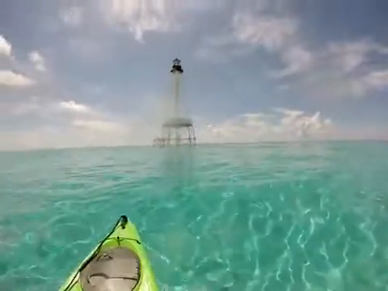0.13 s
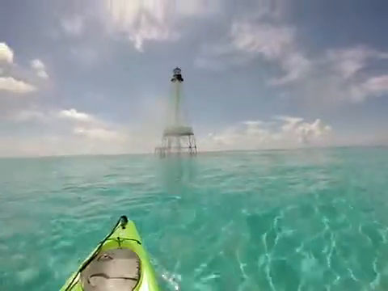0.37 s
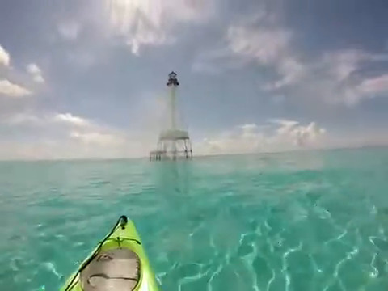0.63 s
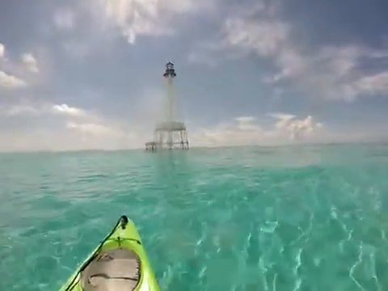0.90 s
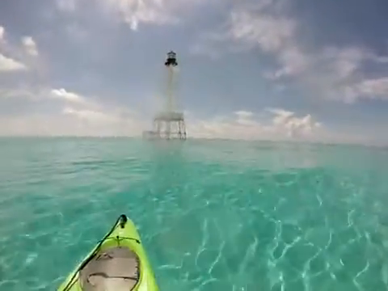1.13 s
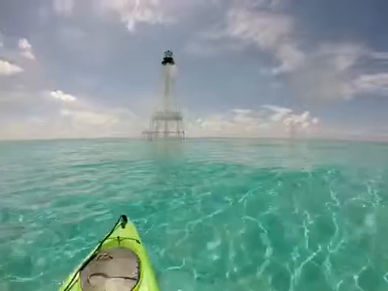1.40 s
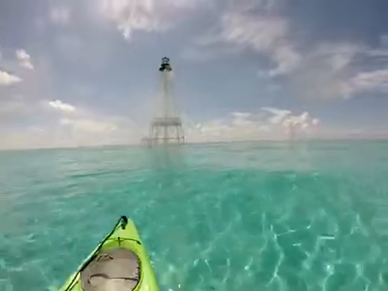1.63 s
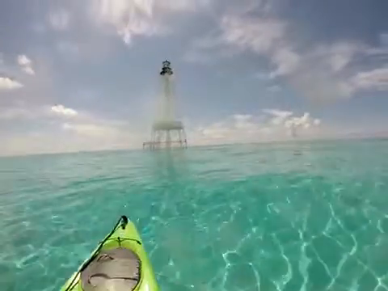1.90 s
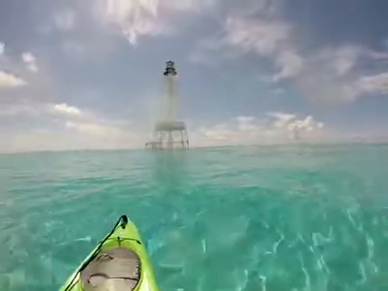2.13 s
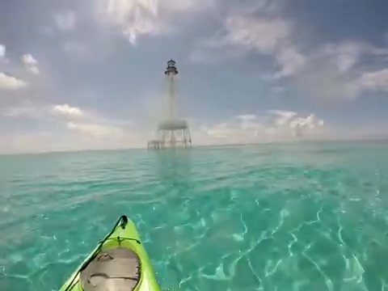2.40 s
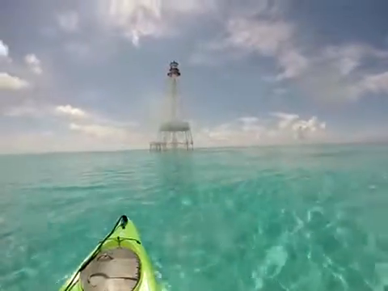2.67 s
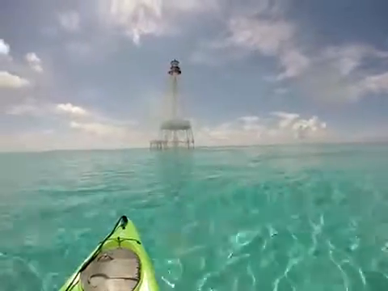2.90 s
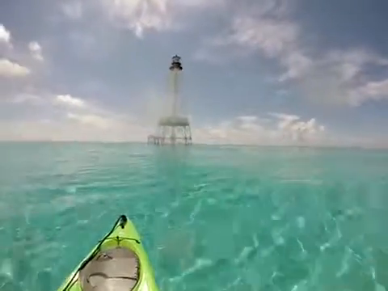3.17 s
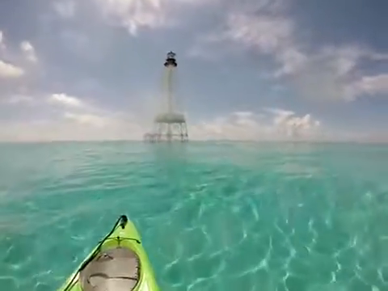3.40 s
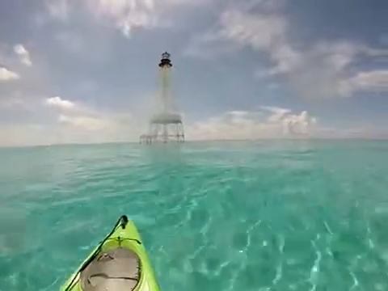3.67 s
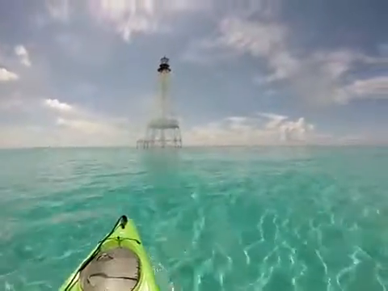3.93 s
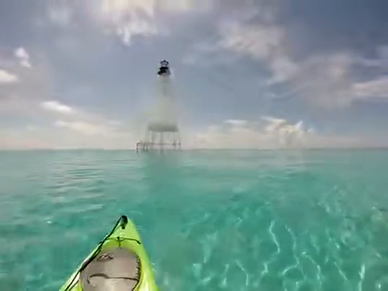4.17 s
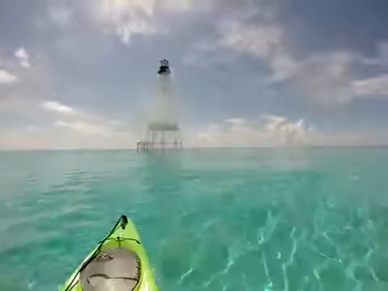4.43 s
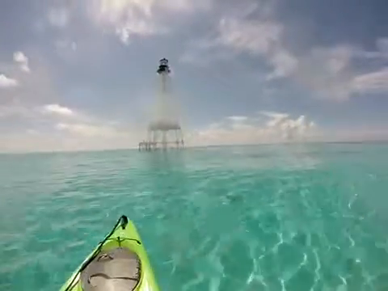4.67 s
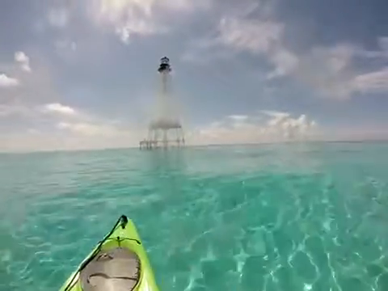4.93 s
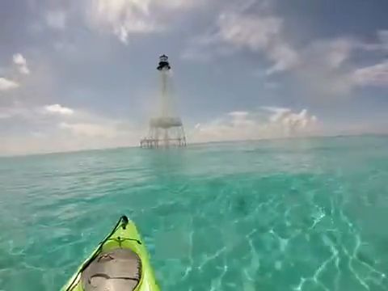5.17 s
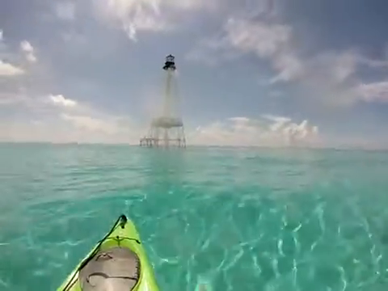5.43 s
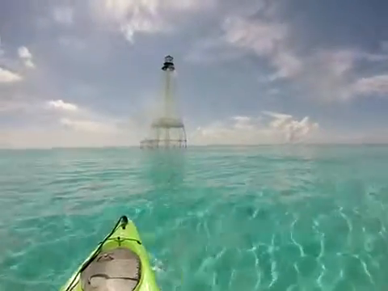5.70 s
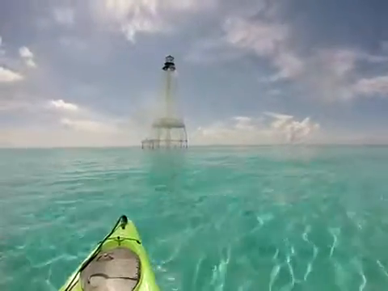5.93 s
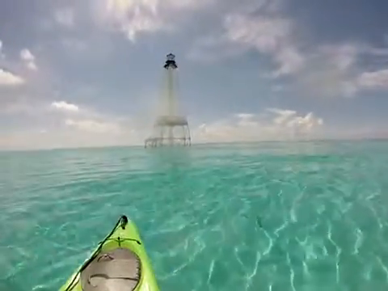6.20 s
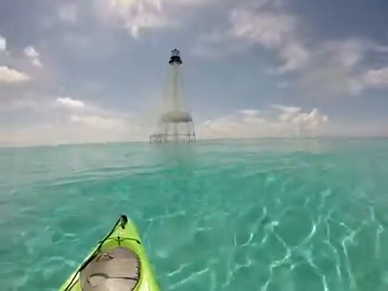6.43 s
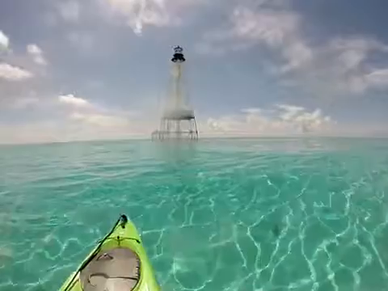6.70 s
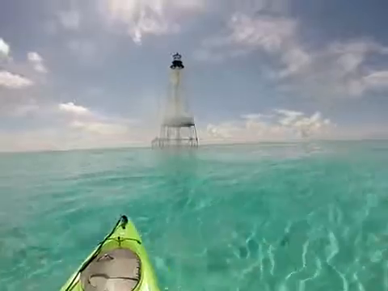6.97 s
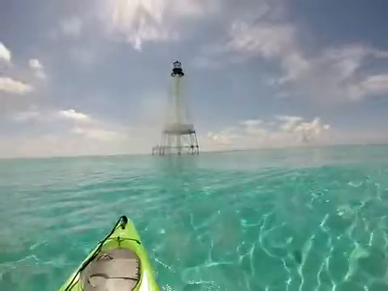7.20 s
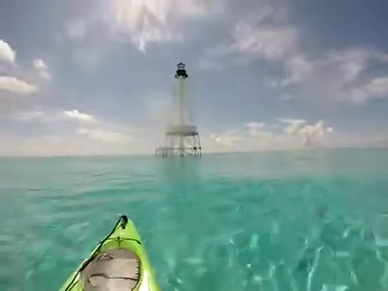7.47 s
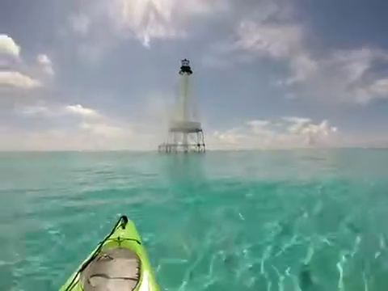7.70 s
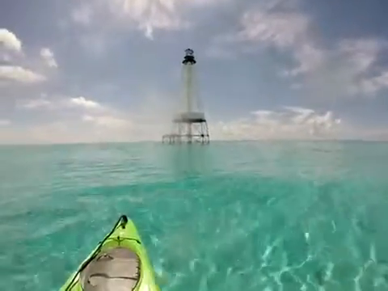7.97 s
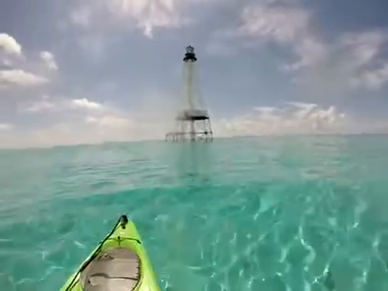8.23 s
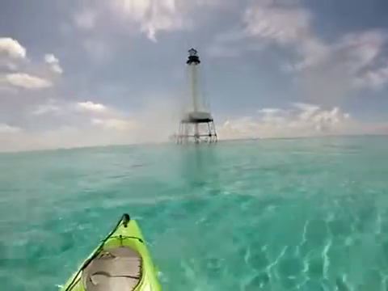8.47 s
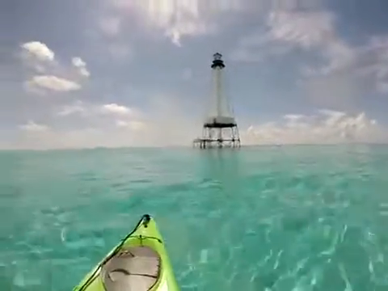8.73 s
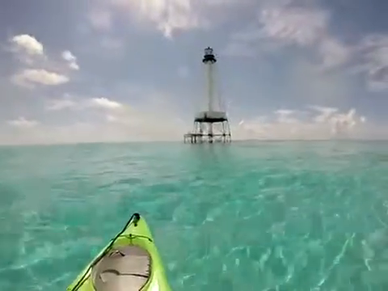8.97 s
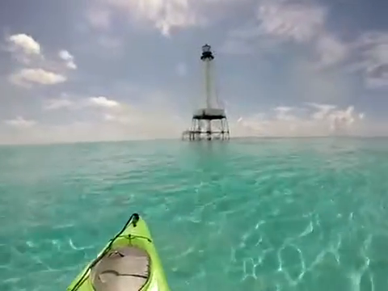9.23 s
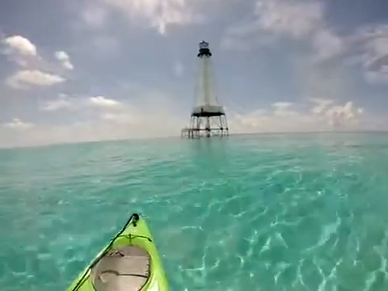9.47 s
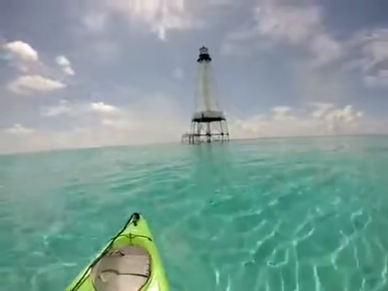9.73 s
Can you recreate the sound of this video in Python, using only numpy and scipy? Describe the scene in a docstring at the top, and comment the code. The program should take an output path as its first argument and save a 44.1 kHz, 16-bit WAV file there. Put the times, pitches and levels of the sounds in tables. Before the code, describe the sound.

Calm sea heard from a kayak, in mono, close and dry, slightly boxy through a sealed plastic case. A faint, soft wash runs throughout above a low rumble that swells and fades as the hull rocks. From 0 to 2 s small splashes, gurgles and plinking drips come in clumps, with hollow booms near 1.1 and 1.8 s. Around 2.3 s another gurgle, then sparser trickling, a clear drop at 3.3 s and gentle thuds to 5 s. A soft thud at 5.6 s leads to a bright cluster of drips and spray at 6.1 s, with busy trickling until about 7.6 s. At 8.4 s a heavy, deep bump breaks the calm: the case swings and is rubbed, with a loud plastic knock at 8.9 s and lesser bumps to 9.2 s. It quiets, a round drop plinks at 9.55 s, and a strong thump with a sharp crack ends it at 9.8 s.

```python
"""A soft wash of calm sea and trickling water comes first, as a kayak glides with a rumble of its rocking hull.
Drips leave ringing bubbles, the hollow hull booms in low damped tones and wavelets thud on it as pulses.
Water off paddle and bow is clouds of tiny bubble tones, partly heard through air spaces of a sealed plastic case.
Near the end the case holding the microphone swings, is rubbed and jolted (shaped noise and low damped tones),
and is knocked, which rings the modes of its plastic."""
import sys
import numpy as np
from scipy import signal
from scipy.fft import rfft, irfft, next_fast_len
from scipy.io import wavfile
from scipy.ndimage import uniform_filter1d, map_coordinates

SR = 44100
rng = np.random.default_rng(int(sys.argv[2]) if len(sys.argv) > 2 else 0)


def decibels_to_gain(level_db):
    """Convert a level in decibels to a linear amplitude gain (20 dB per decade)."""
    exponent = np.asarray(level_db, float) / 20
    return 10 ** exponent


def persist_wave(psi):
    """Save psi, clipped to +-1, as 16-bit WAV."""
    counts = np.round(np.clip(psi, -1, 1) * 32767).astype(np.int16)
    wavfile.write(sys.argv[1], SR, np.atleast_2d(counts).T)


N = 434826  # length [samples]


def unit(x):
    """Power normalisation: scales a signal to rms 1."""
    return x / np.sqrt(np.mean(x ** 2) + 1e-20)


def noise():
    """White noise: equal power at every frequency, rms near 1."""
    return rng.standard_normal(N)


def gains(*tables):
    """Envelopes: one gain per level column, straight in dB between points and silent outside each table."""
    t = np.arange(N) / SR
    total = 0
    for table in tables:
        seconds, *columns = np.transpose(table)
        total = total + np.array([decibels_to_gain(np.interp(t, seconds, db, -150, -150)) for db in columns])
    return uniform_filter1d(total, size=400, axis=1)


def swells(rows, rise, fall):
    """Exponential growth and decay: each gain climbs to its peaks and sinks at steady rates [dB/s]."""
    lead = SR // 5  # room for the climb ahead of a peak
    u = (np.arange(2 * lead) - lead) / SR
    shape = decibels_to_gain(np.minimum(rise * u, -fall * u))
    out = np.zeros((len(rows[0]) - 1, N + lead))
    for s, *levels in rows:
        for track, db in zip(out, levels):
            add(track, s, decibels_to_gain(db) * shape)
    return out[:, lead:]


def wobble(rate):
    """Random modulation: a smooth curve through rate random knots a second."""
    knots = rng.standard_normal(int(N * rate / SR) + 4)
    return map_coordinates(knots, [np.arange(N) * rate / SR])


def filtered(x, response):
    """Linear filtering: multiplies the spectrum of x by a response of frequency."""
    m = next_fast_len(N + SR // 2)
    return irfft(rfft(x, m) * response(np.fft.rfftfreq(m, 1 / SR)), m)[:N]


def resonant(peaks):
    """Modal sum: second-order resonances (centre [Hz], width [Hz], level [dB]) in alternating sign."""
    def response(f):
        total = 0
        for k, (centre, width, db) in enumerate(peaks):
            damping = 1j * f * width
            total = total + (-1) ** k * decibels_to_gain(db) * damping / (centre * centre - f * f + damping)
        return total
    return response


def band(x, lo_hz, hi_hz):
    """Band limiting: keeps lo_hz to hi_hz and scales to rms 1."""
    sos = signal.butter(3, [lo_hz, hi_hz], "band", fs=SR, output="sos")
    return unit(signal.sosfilt(sos, x))


def add(track, s, sound):
    """Superposition: mixes a sound into the track at s seconds."""
    part = track[round(s * SR):][:len(sound)]
    part += sound[:len(part)]


def bubble(hz, t60, t, rise, attack):
    """Damped oscillator: a decaying tone; rise > 0 makes it climb as a bubble does nearing the surface."""
    phase = 2 * np.pi * hz * t * (1 + rise * t / t60)
    return decibels_to_gain(-60 * t / t60) * (1 - np.exp(-t / attack)) * np.sin(phase)


def grains(count, hz, spread, cycles, scatter_db, size):
    """Bubble statistics: random bubbles of log-normal pitch and strength, ringing for cycles, rms 1."""
    when = rng.random(count)
    pitch, strength = rng.standard_normal((2, count))
    f = np.clip(hz * np.exp(spread * pitch), 50, SR / 3)[:, None]
    rings = bubble(f, cycles / f, np.arange(size) / SR, rise=0.072, attack=0.00022)
    sounds = decibels_to_gain(scatter_db * strength)[:, None] * rings
    at = (when * N).astype(int)[:, None] + np.arange(size)
    return unit(np.bincount(at.ravel(), sounds.ravel(), N + size)[:N])


# spectrum of far sea and microphone hiss, before scaling to rms 1: (frequency [Hz], density [dB per Hz])
SEA_SPECTRUM = [(15, -22), (50, -2), (140, -5.5), (300, -10), (600, -13.5), (1000, -17), (2400, -24),
                (3500, -25), (4800, -28), (6500, -33), (8500, -36), (11000, -39.5), (15000, -47.5)]


def sea():
    """Broadband noise: many far wavelets merge into a steady wash, slightly patchy in time and frequency."""
    hz_points, db = np.transpose(SEA_SPECTRUM)
    cells = signal.stft(noise(), nperseg=512)[2]
    patches = uniform_filter1d(rng.standard_normal(cells.shape), 6, 0)
    patches = unit(uniform_filter1d(patches, 10, 1))
    wash = signal.istft(cells * decibels_to_gain(1.1 * patches), nperseg=512)[1][:N]
    wash = unit(filtered(wash, lambda hz: decibels_to_gain(np.interp(np.log(hz + 1), np.log(hz_points), db))))
    return decibels_to_gain(-54.5 + 0.78 * wobble(7.1)) * wash


# swell rocking the hull, mean level that a random wobble varies: (time [s], level [dB])
ROCKING_LEVEL = [(0, -54.5), (.58, -53), (1.53, -59), (1.81, -47.5), (2.1, -61), (2.47, -48), (3.04, -57),
                 (3.51, -50), (4.26, -55.5), (4.95, -53.5), (5.14, -44), (5.74, -64.5), (6.6, -47.5),
                 (7.06, -54.5), (7.8, -48), (8.3, -53.5), (8.4, -43), (9.09, -47), (9.25, -62),
                 (9.45, -50.5), (9.86, -49)]
# low hull resonances: (centre [Hz], width [Hz], level [dB])
HULL_MODES = [(35.4, 13.8, 1), (70.4, 11.8, 3.5), (137, 20.6, -1)]


def rocking():
    """Forced resonance: swell drives the hull at random and its low modes rumble."""
    rumble = unit(filtered(noise(), resonant(HULL_MODES)))
    return gains(ROCKING_LEVEL)[0] * decibels_to_gain(2.5 * wobble(5.1)) * rumble


# water running off paddle and bow, before clumping: (time [s], gurgle [dB], trickle [dB], fizz [dB])
RUNOFF_LEVELS = [(0, -70, -63.5, -60.5), (.2, -64, -72, -77), (.5, -66.5, -61.5, -65),
                 (1.05, -58.5, -56.5, -65.5), (1.35, -70, -65.5, -73), (1.95, -77, -67, -74),
                 (2.33, -56.5, -62, -63), (3.05, -66, -65.5, -64), (3.2, -62, -65.5, -71),
                 (3.75, -65, -58.5, -66.5), (4.13, -70, -66.5, -72), (4.6, -73, -68, -76),
                 (5.03, -63.5, -62, -64), (5.4, -68, -62.5, -75), (5.95, -74, -74, -70),
                 (6.3, -64, -66, -70.5), (6.7, -59.5, -58.5, -63.5), (7.1, -63.5, -66, -70),
                 (8.1, -73, -69, -77), (8.28, -59, -60, -64), (9.3, -76, -66, -77), (9.63, -58, -66, -69),
                 (9.86, -66, -72, -76)]
# the thinnest dribble, before clumping: (time [s], level [dB])
DRIBBLE_LEVEL = [(0, -64), (.2, -79), (.5, -62), (.85, -69), (1.2, -85), (1.42, -62), (1.9, -78),
                 (2.3, -64.5), (2.9, -64), (3.3, -74), (4.6, -79), (4.95, -63), (5.3, -67.5), (5.6, -81),
                 (5.95, -72), (6.04, -62.5), (6.65, -60), (7.1, -73), (7.4, -77), (9.86, -79)]
# large bubbles glugging along the hull, before clumping: (time [s], peak gain [dB])
GLUG_PEAKS = [(.32, -49), (.37, -42.5), (.46, -62), (.71, -51), (.775, -52), (1.11, -42), (1.71, -49),
              (1.82, -41), (1.96, -52), (3.35, -51), (4.36, -47), (4.7, -53), (6.16, -49), (6.3, -57),
              (6.76, -58), (6.97, -51), (7.27, -50), (7.45, -70), (8.07, -53), (8.52, -43), (8.626, -46.5),
              (8.78, -48), (9.514, -58), (9.59, -49)]
# brief splashes, before clumping: (time [s], trickle peak gain [dB], fizz peak gain [dB])
SPLASH_PEAKS = [(.16, -55.5, -68), (.27, -59, -78), (0.342, -47, -79), (0.391, -60, -50), (.47, -51, -60),
                (.7, -51, -63), (.78, -53, -61), (1.11, -56, -57.5), (1.43, -65, -60), (3.25, -54, -83),
                (3.35, -54.5, -62), (3.62, -81, -76), (4.2, -67, -57), (4.7, -61, -73), (5.33, -68, -60),
                (6.039, -61, -66), (6.16, -69, -48), (6.31, -58, -62), (6.52, -64, -79), (6.73, -53, -65),
                (6.9, -68, -59), (6.98, -70, -60), (7.5, -60, -82)]
# air spaces of the case: (centre [Hz], width [Hz], level [dB])
CASE_SPACES = [(533, 240, -2), (1435, 427, 5), (2450, 524, 2), (5640, 1550, -6)]


def water():
    """Bubble acoustics: clumped bubbles of several sizes; all but the large pass the case's air spaces."""
    glugs = swells(GLUG_PEAKS, rise=740, fall=380)  # dB/s
    splashes = swells(SPLASH_PEAKS, rise=700, fall=710)  # dB/s
    gurgle, trickle, fizz = gains(RUNOFF_LEVELS) + np.vstack([glugs, splashes])
    clump = wobble(13)  # shared, so all sizes surge together

    large = grains(count=1800, hz=467.5, spread=0.415, cycles=29.6, scatter_db=2.5, size=2800)
    small = grains(count=7000, hz=1910, spread=0.379, cycles=45, scatter_db=2.0, size=700)
    spray = grains(count=15000, hz=5990, spread=0.403, cycles=27, scatter_db=4, size=250)
    thin = grains(count=2500, hz=2400, spread=.13, cycles=44, scatter_db=6, size=900)

    small = unit(filtered(small, resonant(CASE_SPACES)))
    spray = unit(filtered(spray, resonant(CASE_SPACES)))
    thin = unit(filtered(thin, resonant(CASE_SPACES[2:3])))

    out = gurgle * decibels_to_gain(3.5 * clump + 0.48 * wobble(21)) * large
    out += gains(DRIBBLE_LEVEL)[0] * decibels_to_gain(2.1 * clump) * thin
    out += trickle * decibels_to_gain(2.0 * clump) * small
    out += fizz * decibels_to_gain(0.91 * clump + 1.4 * wobble(30)) * spray
    return out


# single drips, gains before attack, decay and case resonance:
# (time [s], bubble [dB], bubble pitch [Hz], splat [dB re bubble], spray [dB re bubble])
SINGLE_DROPS = [(0.299, -38, 528, -8, -27), (0.345, -28, 530, 5, -34), (0.379, -43, 475, -3, -9),
                (0.453, -42, 540, 12, -4.5), (0.654, -51, 494, 20, -7), (0.779, -39, 510, 0, -21),
                (0.844, -43, 2570, 14, -15), (0.922, -38, 1435, -5, -28), (1.397, -41, 2530, 4, -15),
                (1.417, -38.5, 2470, 1, -8), (1.671, -39.5, 1396, 11.5, -22), (1.692, -37, 510, -4, -25),
                (1.822, -43, 442, -4, -29), (2.149, -48, 1830, -4, -21), (2.242, -43, 574, 13.5, -17),
                (2.422, -37, 2450, -1, -20), (2.959, -54, 480, 8, 4.5), (3.255, -32.5, 1450, -12, -31),
                (3.291, -43, 1540, 6, -19), (3.612, -40, 1450, 13, -21), (3.649, -42, 610, -1, -24),
                (4.174, -48, 1240, 20, 3), (4.2, -39, 2520, 8, -9.5), (4.334, -40, 493, -7, -27),
                (4.684, -34, 2470, 0, -31), (4.692, -37.5, 1190, 1, -30), (4.87, -37.5, 2190, -13, -32),
                (5.331, -38, 2230, 3, -40), (5.168, -44, 1300, 2, -25), (5.508, -56, 2260, 0, 0),
                (5.543, -44.5, 1120, 1, -26), (5.805, -60, 2400, 0, 6), (6.018, -47, 2450, 0, -6),
                (6.114, -32.5, 2050, 6.5, -4.5), (6.147, -60, 2400, 0, 2), (6.155, -28.5, 2430, -9, -5),
                (6.168, -39, 2570, -6, -13), (6.253, -38.5, 2070, 2, -17), (6.289, -38.5, 2380, -3, -18),
                (6.479, -46.5, 2400, -5, -10), (6.536, -39.5, 2310, 2, -27), (6.619, -43.5, 2050, 9, -13),
                (6.659, -41.5, 1470, 11.5, -26), (6.721, -35.5, 1450, 2, -18), (6.741, -42, 700, -8, -25),
                (6.752, -46.5, 705, 0, 2), (6.951, -41, 2060, 14, -23), (6.958, -33, 1100, -10, -30),
                (6.992, -41.5, 4950, -6, -15), (7.008, -43.5, 1840, 4, -22), (7.086, -51, 420, 15.5, -24),
                (7.267, -42, 484, 6, -30), (7.475, -38, 1244, -9, -32), (7.506, -43, 1290, -3, -28),
                (7.555, -41, 700, 8, -27), (7.606, -42.5, 2000, -3, -26), (7.669, -39, 1370, -8, -26),
                (7.838, -45.5, 1800, -4, -23), (8.071, -37, 695, -16, -28), (8.215, -49, 1970, -5, -12),
                (8.466, -54.5, 2400, -2, 2), (8.729, -44.5, 533, 12.5, -26), (8.844, -33, 1390, -3, -39),
                (8.89, -40, 490, 4, -29), (9.504, -41, 750, -6, -25), (9.552, -28, 665, -14, -37),
                (9.724, -42, 1200, -3, -20)]


def drips():
    """Impact and entrained bubble: each drop splats, throws spray and leaves a ringing bubble."""
    t = np.arange(SR // 5) / SR
    tones, splats, spray = np.zeros((3, N))
    burst_decay_db = -60 * t / 0.018
    for s, db, hz, splat_db, spray_db in SINGLE_DROPS:
        t60 = 0.044 * (1000 / hz) ** 0.57  # [s]; smaller, higher bubbles die sooner
        burst = rng.standard_normal((2, len(t))) * (1 - np.exp(-t / 0.001))
        add(tones, s, decibels_to_gain(db) * bubble(hz, t60, t, rise=0.067, attack=1.0 / hz))
        add(splats, s, decibels_to_gain(db + splat_db + burst_decay_db) * burst[0])
        add(spray, s, decibels_to_gain(db + spray_db + burst_decay_db) * burst[1])
    top = resonant(CASE_SPACES[3:])
    splats = filtered(splats, resonant(CASE_SPACES[:3]))
    spray = filtered(spray, lambda f: decibels_to_gain(27.5) * top(f) ** 2)
    return tones + splats + spray


# low damped tones: hull booms, then from about 8.4 s the jolted case resounding;
# gain before attack and decay: (time [s], level [dB], pitch [Hz], t60 [s])
LOW_BOOMS = [(0.33, -38.5, 137, 0.46), (0.648, -41.5, 137, 0.31), (0.749, -41, 141, 0.55),
             (1.102, -32.5, 142, 0.23), (1.508, -34.5, 136, 0.074), (1.597, -41, 133, 0.14),
             (1.823, -31, 170, 0.11), (2.327, -36, 152, 0.19), (2.46, -40, 121, 0.22),
             (2.709, -41, 137, 0.16), (3.009, -41.5, 134, 0.15), (3.341, -37.5, 139, 0.25),
             (4.323, -40, 121, 0.49), (4.962, -47, 112, 0.34), (5.035, -36, 158, 0.15),
             (6.156, -32, 138, 0.25), (6.291, -35.5, 142.7, 0.27), (6.584, -46.5, 143, 0.6),
             (6.967, -41, 108, 0.11), (7.083, -40.5, 140, 0.24), (7.272, -32.5, 144, 0.18),
             (7.58, -35.5, 133, 0.098), (7.947, -38.5, 151, 0.13), (8.288, -38.5, 102, 0.18),
             (8.434, -9, 118.3, 0.13), (8.62, -18, 103.2, 0.13), (8.801, -30, 141, 0.093),
             (8.889, -26, 138.4, 0.23), (9.015, -20.5, 127.5, 0.105), (9.186, -25, 126, 0.11),
             (9.45, -38, 137, 0.082), (9.797, -18, 101, 0.15)]


def booms():
    """Damped resonance: low tones ring and decay, first hull booms, later the jolted case resounding."""
    out, t = np.zeros(N), np.arange(SR // 2) / SR
    for s, db, hz, t60 in LOW_BOOMS:
        add(out, s, decibels_to_gain(db) * bubble(hz, t60, t, rise=0, attack=0.0028))
    return out


# wavelets slapping the hull, then heavier bumps from 8.4 s; gain of push and sway: (time [s], level [dB])
THUD_LEVELS = [(0.463, -32), (0.684, -30), (1.24, -42.5), (2.332, -39), (2.468, -38), (3.134, -29.5),
               (3.38, -37), (3.837, -37.5), (4.024, -32.5), (4.233, -32.5), (4.451, -38), (4.943, -32),
               (5.09, -35), (5.637, -26), (6.277, -26.5), (6.465, -36), (6.956, -33), (7.327, -31.5),
               (7.503, -30.5), (7.709, -33), (8.289, -36), (8.417, -17), (8.599, -22.5), (8.934, -20),
               (9.173, -25), (9.797, -12.5)]


def thuds():
    """Impulse response: a soft blow pushes once and leaves a low mode swaying."""
    out, t = np.zeros(N), np.arange(SR // 2) / SR
    push_hz, sway_hz, sway_t60, sway_db = 57, 27.6, 0.37, -3.5  # Hz, Hz, s, dB
    u = t - .022  # the pressure peaks a moment after first contact
    push = np.exp(-(u * push_hz / 0.39) ** 2) * np.cos(2 * np.pi * push_hz * u + .5)
    sway = decibels_to_gain(sway_db) * bubble(sway_hz, sway_t60, t, rise=0, attack=0.047)
    for s, db in THUD_LEVELS:
        add(out, s, decibels_to_gain(db) * (push + sway))
    return out


# the case swinging slowly in the hand, two spells: (time [s], level [dB])
SWAYING_LEVELS = [
    [(8.28, -64), (8.41, -27), (8.445, -38.5), (8.49, -21), (8.52, -33), (8.67, -26.5), (8.78, -58),
     (8.86, -35), (8.89, -46), (8.95, -24.5), (9.03, -27), (9.14, -48), (9.245, -42), (9.28, -60)],
    [(9.803, -14), (9.815, -17.5), (9.86, -23.5)],
]


def swaying():
    """Low-frequency excitation: slow swings of the case shake the microphone."""
    return gains(*SWAYING_LEVELS)[0] * band(noise(), 16.7, 41.6)


# fingers sliding on the case: (start [s], end [s], rub level [dB], hiss [dB re rub])
FINGER_RUBS = [(8.293, 8.36, -58, -5.5), (8.364, 8.441, -43, -23), (8.458, 8.511, -44.5, -23),
               (8.815, 8.838, -56, -25), (8.937, 8.986, -44.5, -33), (8.991, 9.052, -46, -30),
               (9.06, 9.097, -46.5, -24), (9.691, 9.724, -58.5, -3), (9.808, 9.831, -37, 6),
               (9.832, 9.847, -44, 4.5), (9.851, 9.87, -46.5, 1)]


def rubbing():
    """Stick-slip friction: fingers rub the plastic in quick slips that excite its resonances."""
    t = np.arange(N) / SR
    rub, hiss = np.zeros((2, N))
    for start, end, db, hiss_db in FINGER_RUBS:
        stroke = np.clip(np.minimum(t - start, end - t) / .008 + .5, 0, 1)  # 8 ms edges
        rub += decibels_to_gain(db) * stroke
        hiss += decibels_to_gain(db + hiss_db) * stroke
    slips = noise() * decibels_to_gain(2.6 * wobble(300))
    # resonances: (centre [Hz], width [Hz], level [dB])
    body = filtered(slips, resonant([(1450, 183, -0.5), (2020, 180, -3), (2490, 160, -10.5)]))
    bright = filtered(slips, resonant([(2600, 300, 24), (5100, 900, -13), (8200, 4000, -24)]))
    return rub * band(body, 660, 3500) + hiss * band(bright, 1500, 10500)


# dull jolts of the case, before random wobble: (time [s], peak gain [dB])
CASE_JOLTS = [(8.298, -48), (8.44, -19.5), (8.628, -32), (8.944, -27.5), (9.026, -28), (9.194, -30),
              (9.81, -28), (9.86, -27)]


def jolts():
    """Transient excitation: jolts shake the microphone in dull bursts of low noise."""
    thump = swells(CASE_JOLTS, rise=930, fall=440)[0]  # dB/s
    return thump * decibels_to_gain(2.3 * wobble(40)) * band(noise(), 58, 235)


# knocks on the case:
# (time [s], ring peak [dB], sharpness [dB per octave], contact [s], crack noise [dB re ring peak])
CASE_KNOCKS = [(8.796, -24.5, -7, 0.011, -31), (8.9346, -6.5, -1.5, 0.0073, -37),
               (9.188, -27, -2, .02, -39), (9.7976, -25.5, 2.5, 0.0056, -2.5), (9.816, -28, 9, 0.0056, -10)]
# the plastic ringing, before sharpness, scatter and damping limit: (mode [Hz], level [dB], t60 [s])
PLASTIC_MODES = [(269.6, -1, 0.054), (741, 10, 0.012), (1100, 4.5, 0.015), (1228, 4, 0.015),
                 (1735, 9, 0.0085), (1830, 0.5, 0.03), (2050, -7, 0.015), (2400, -16, 0.022),
                 (2920, -11, 0.025), (3190, -14.5, 0.015), (4570, -15, 0.013), (4740, -8.5, 0.0077),
                 (5860, -35, 0.0065)]


def knocks():
    """Modal excitation: a chattering contact cracks and rings the plastic; a sharper one favours high modes."""
    out, t = np.zeros(N), np.arange(SR // 10) / SR
    most_cycles = 55  # plastic damps its high modes quickly
    for s, db, sharp_db, contact, crack_db in CASE_KNOCKS:
        scatter = rng.normal(0, 1.2, len(PLASTIC_MODES))  # dB
        ring = np.zeros(len(t))
        for (hz, level, t60), change in zip(PLASTIC_MODES, scatter):
            mode_db = level + change + sharp_db * np.log2(hz / 1000)
            ring += decibels_to_gain(mode_db) * bubble(hz, min(t60, most_cycles / hz), t, rise=0, attack=0.0009)
        chatter = rng.standard_normal(len(t)) * np.exp(-(t / contact) ** 3)
        chatter[0] = 6  # first contact is the hardest
        blow = signal.fftconvolve(chatter, ring)
        crack = band(rng.standard_normal(len(t)), 1600, 6300)
        add(out, s, decibels_to_gain(db) * blow / np.abs(blow).max())
        add(out, s, decibels_to_gain(db + crack_db - 60 * t / 0.0085) * crack)
    return out


def scene():
    """Superposition: the pressures of all sources add at one microphone."""
    sea_and_hull = sea() + rocking() + water() + drips() + booms() + thuds()
    handling = swaying() + rubbing() + jolts() + knocks()
    return (sea_and_hull + handling)[None]


def top_cut(x):
    """Nothing passes above the cut-off."""
    return signal.sosfilt(signal.butter(12, 15270, fs=SR, output="sos"), x)


def record(dry):
    """Storage: the single-microphone mix is kept with no added gain or reverberation."""
    return top_cut(dry)


dry = scene()
out = record(dry)
persist_wave(out)
```